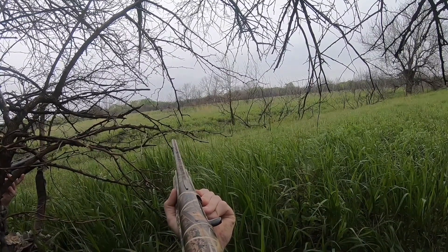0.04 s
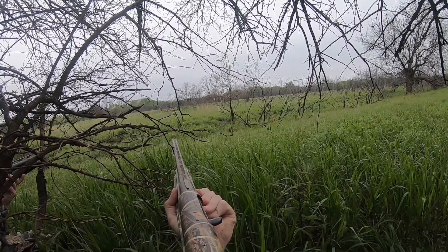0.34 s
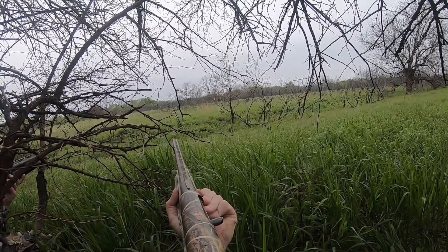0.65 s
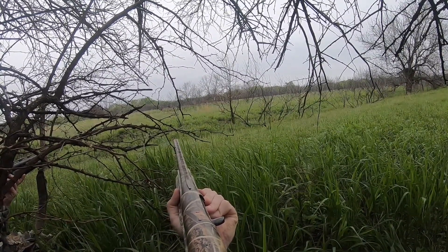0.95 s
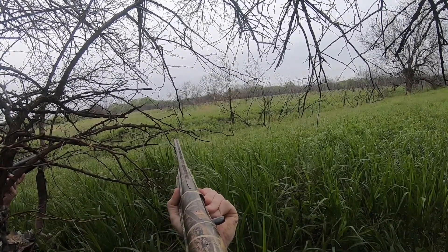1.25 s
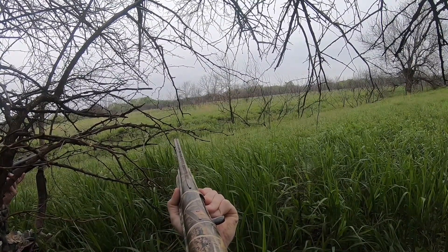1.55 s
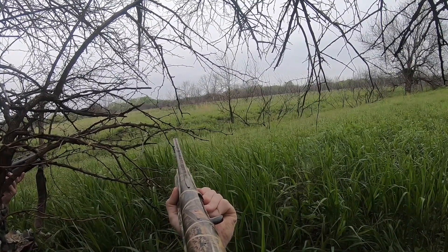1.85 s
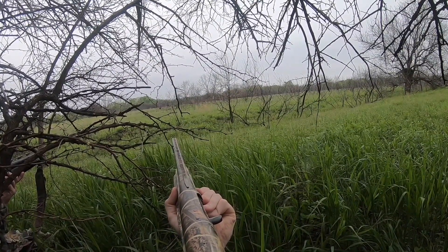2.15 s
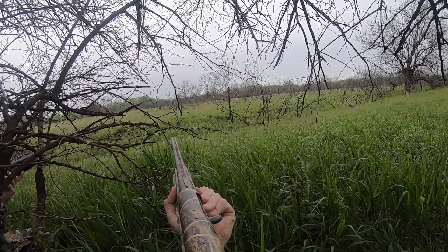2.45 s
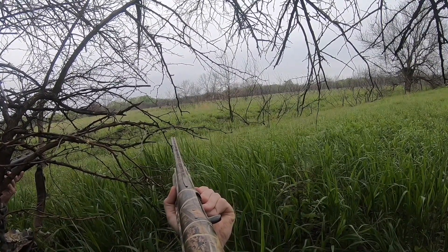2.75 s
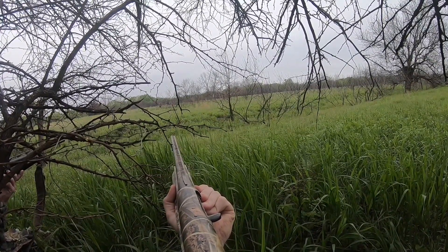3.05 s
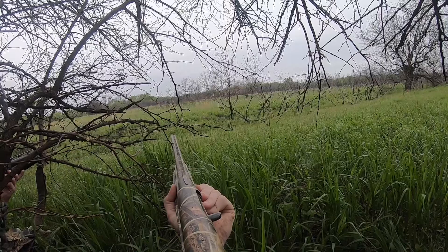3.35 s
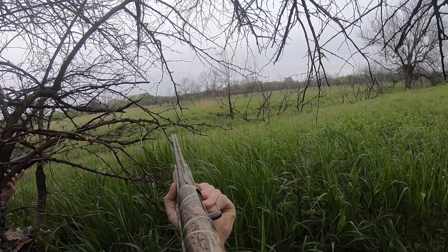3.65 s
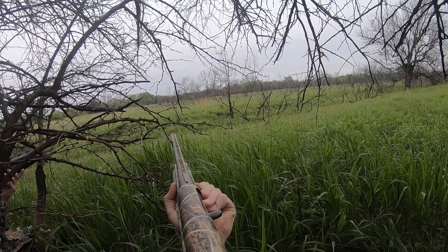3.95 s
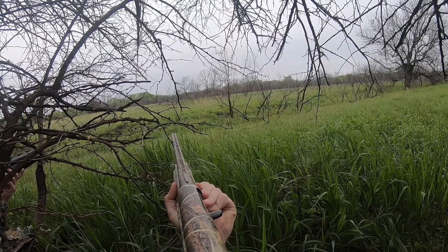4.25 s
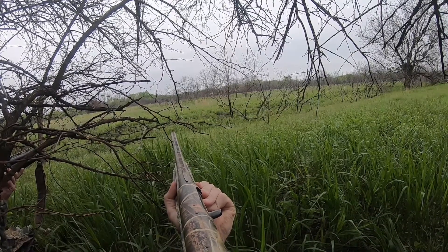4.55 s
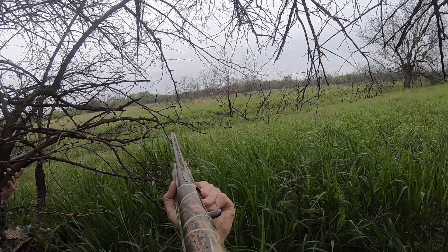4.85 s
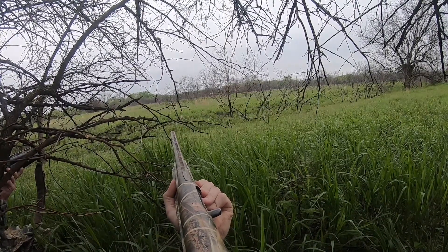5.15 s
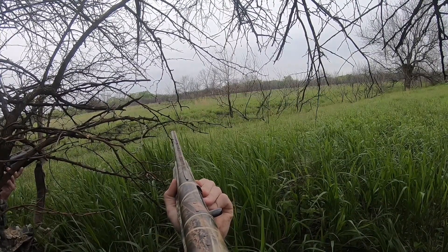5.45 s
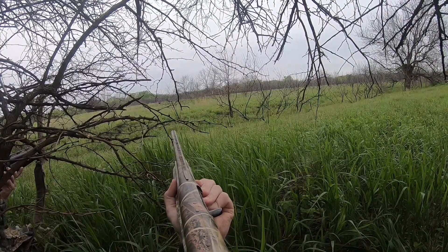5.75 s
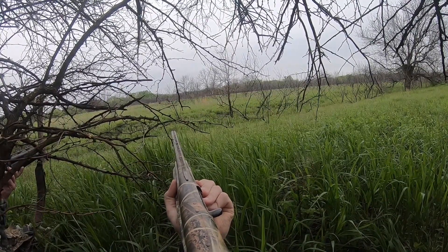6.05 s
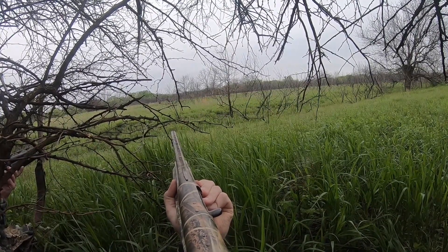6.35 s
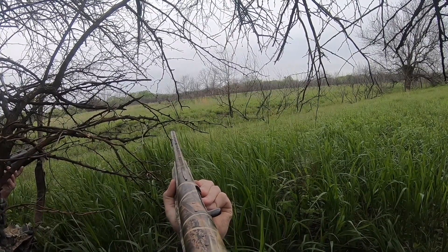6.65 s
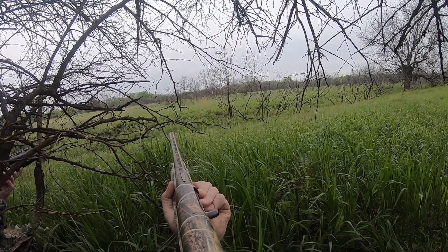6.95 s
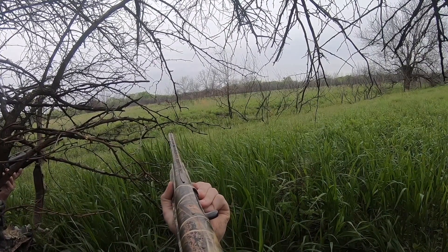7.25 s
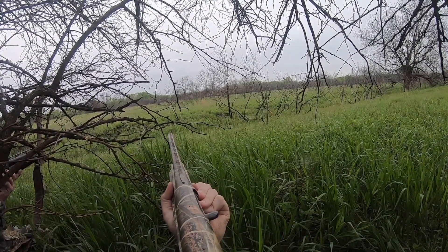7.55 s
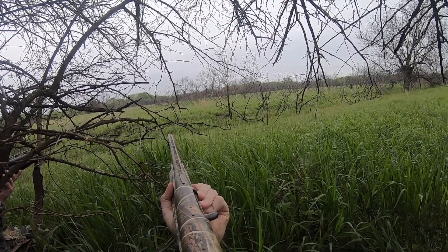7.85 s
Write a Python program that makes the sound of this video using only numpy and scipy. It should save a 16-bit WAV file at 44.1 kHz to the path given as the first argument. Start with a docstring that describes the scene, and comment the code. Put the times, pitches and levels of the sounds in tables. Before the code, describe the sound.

Birdsong in open country, picked up by a hand-held microphone with occasional dull handling thumps. A fast, high trill opens, along with a faint far knock, followed by scattered distant chirps. Halfway through, a closer, louder sparrow on the right sings sliding notes and whistles around a rapid warble, with a slight echo from the trees. Far traffic rumbles quietly beneath a light hiss throughout.

```python
"""Two sparrows sing at the edge of a meadow, to the right of a hand-held microphone. The nearer one gives
four slides, two arched whistles and a fast warbled trill; the other speeds up a trill of down-slurs.
Each note is a nearly pure tone from the syrinx, scattered by the trees. Other birds call further off,
something knocks far away, the hand bumps the microphone softly and distant traffic rumbles."""
import sys
import numpy as np
from scipy import signal
from scipy.fft import rfft, irfft
from scipy.io import wavfile
from scipy.ndimage import uniform_filter1d, map_coordinates

SR = 44100
rng = np.random.default_rng(int(sys.argv[2]) if len(sys.argv) > 2 else 0)


def dump_mix(stems):
    """Bounce the given channels to the path in sys.argv[1] as a 16-bit WAV at rate SR."""
    frames = np.atleast_2d(stems).T  # one column per channel
    limited = np.clip(frames, -1, 1)  # hard clip at full scale
    pcm = np.round(limited * 32767).astype(np.int16)
    wavfile.write(sys.argv[1], SR, pcm)


N = 357651
TIME = np.arange(N) / SR
FREQ = np.maximum(np.arange(N // 2 + 1) * SR / N, 1)

# The near sparrow's three note shapes. Each row: share of the note, pitch in Hz, level in dB.
SLIDE_SHAPE = [(0, 5450, -18), (.08, 5220, -4), (.16, 4650, -1), (.23, 4120, 0), (.31, 3880, -2),
               (.43, 3750, -4), (.82, 3670, -4), (.95, 3590, -6), (1, 3480, -20)]
ARCH_SHAPE = [(0, 2650, -19), (.11, 3200, -7), (.23, 3470, -3), (.36, 3530, 0), (.53, 3520, 0),
              (.72, 3440, -2), (.87, 3220, -4), (.96, 3040, -7), (1, 2950, -26)]
WARBLE_SHAPE = [(0, 3950, -24), (.1, 4020, -7), (.25, 4040, 0), (.33, 3790, -3), (.41, 3500, -9),
                (.49, 3330, -11), (.58, 3110, -11), (.65, 3150, -8), (.73, 3480, -2), (.81, 3800, 1),
                (.89, 3930, 0), (1, 4020, -16)]
# Its slides and arched whistles. Each row: start in seconds, length in seconds, pitch ratio, level in dB.
SLIDE_NOTES = [(3.879, .13, 1, -53.5), (4.067, .137, 1, -41.5), (4.275, .15, 1, -38.5),
               (4.489, .137, 1.01, -35)]
ARCH_NOTES = [(4.706, .197, .995, -37), (6.175, .195, .94, -39.5)]

def near_sparrow(trill_start_s=4.9385, period_s=.0989, settle_notes=1.9):
    """Nearest the microphone: slides, whistles and an even warble that starts flat, soft and long."""
    k = np.arange(12)
    unsettled = np.exp(-k / settle_notes)
    starts = trill_start_s + period_s * k
    lengths = .074 + .0044 * unsettled
    reach = 1 - .29 * unsettled
    levels = -33.5 - 1.5 * unsettled
    warbles = list(zip(starts, lengths, reach, levels))
    song = phrase(SLIDE_SHAPE, SLIDE_NOTES) + phrase(ARCH_SHAPE, ARCH_NOTES)
    song += phrase(WARBLE_SHAPE, warbles, base_hz=3200, uneven_db=.5, uneven_pitch=.005)
    return among_trees(song, left_db=-9.5, lag_ms=.23, scatter_db=-9.5, t60=.31)


# The second sparrow's quick and slow slurs. Each row: share of the note, pitch in Hz, level in dB.
SLUR_SHAPE = [(0, 4060, -27), (.16, 4260, -19), (.36, 3970, -12), (.5, 3730, -4), (.64, 3470, 1),
              (.76, 3290, -3), (.84, 3180, -8), (.92, 3200, -15), (1, 3350, -24)]
SLOW_SLUR_SHAPE = [(0, 3860, -24), (.2, 3770, -15), (.45, 3680, -2), (.63, 3500, 0), (.8, 3300, -3),
                   (.94, 3100, -4), (1, 3030, -20)]
# Its opening notes. Each row: start in seconds, length in seconds, pitch ratio, level in dB.
OPENING_NOTES = [(0.01, 0.12, 1, -44.5), (0.165, 0.08, 1.017, -42.5)]

def trilling_sparrow(start_s=.279, period_s=.0638, slur_s=.074, lag_s=.074, settle_notes=2.2):
    """Further back, down-slurs speed up to a steady beat; as the bird tires they fade and reach less high."""
    k = np.arange(25)
    unsettled = np.exp(-k / settle_notes)
    tired = (k / k[-1]) ** 1.24
    starts = start_s + period_s * k + lag_s * (1 - unsettled)
    reach = 1 - .197 * unsettled - .196 * tired ** 2
    levels = -41.5 - 6.5 * tired - 2.5 * (k == k[-1])
    slurs = [(start, slur_s, ratio, db) for start, ratio, db in zip(starts, reach, levels)]
    song = phrase(SLOW_SLUR_SHAPE, OPENING_NOTES)
    song += phrase(SLUR_SHAPE, slurs, base_hz=3200, uneven_db=.4, uneven_pitch=.005)
    return among_trees(song, left_db=-5, lag_ms=.25, scatter_db=-4, t60=.45)


def phrase(shape, notes, base_hz=0, uneven_db=0, uneven_pitch=0):
    """A bird repeats one shape, each note with its own length, strength and reach from a base pitch."""
    track = np.zeros(N)
    share, hz, db = np.transpose(shape)
    for start, length, reach, note_db in notes:
        louder, higher = rng.standard_normal(2)
        progress = np.linspace(0, 1, int(length * SR))
        contour = uniform_filter1d(np.interp(progress, share, hz), size=180, mode="nearest")
        pitch = (base_hz + reach * (contour - base_hz)) * (1 + uneven_pitch * higher)
        gain = undb(note_db + uneven_db * louder + np.interp(progress, share, db))
        add(track, start, whistle(pitch, gain * signal.windows.tukey(len(gain), .06)))
    return track


def whistle(hz, gain, waver=.008, flutter_db=2.5):
    """The syrinx gives a nearly pure tone whose pitch and strength tremble slightly."""
    hz = hz * (1 + waver * walk(237.8, len(hz)))
    flutter = undb(flutter_db * walk(166.4, len(hz)))
    return gain * flutter * np.sin(2 * np.pi * np.cumsum(hz) / SR)


def glides(notes, waver):
    """Simple whistles bend through three pitches while they swell and fade."""
    track = np.zeros(N)
    for start, length, first, middle, last, db in notes:
        progress = np.linspace(0, 1, int(length * SR))
        pitch = np.polyval(np.polyfit([0, .5, 1], [first, middle, last], 2), progress)
        gain = undb(db) * signal.windows.tukey(len(pitch), .6)
        add(track, start, whistle(pitch, gain, waver))
    return track


def among_trees(sound, left_db, lag_ms, scatter_db, t60, late_db=-15, late_t60=1.0):
    """Sound from the right reaches the left port late and weak; twigs scatter it briefly, trunks longer."""
    t = TIME[:SR]
    echoes = rng.standard_normal((2, SR)) * np.exp(.5 * rng.standard_normal((2, SR)))
    twigs, trunks = undb(-60 * t / t60), undb(late_db - 60 * t / late_t60)
    echoes *= (1 - np.exp(-t / .006)) * (twigs + trunks)
    echoes *= undb([[scatter_db + 1], [scatter_db]]) / np.linalg.norm(echoes, axis=1, keepdims=True)
    left = undb(left_db) * irfft(rfft(sound) * np.exp(-2j * np.pi * FREQ * lag_ms / 1000), N)
    return np.array([left, sound]) + signal.fftconvolve(sound[None], echoes, axes=1)[:, :N]


# Far glides. The first two rows, a fall and a rise, close the lilting bird's first song as its sixth and
# loudest syllable; the rest are a far bird's carol. Each row: start and length in seconds, first, middle and
# last pitch in Hz, level in dB.
FAR_GLIDES = [(2.035, .075, 2850, 2627, 2260, -52.5), (2.1, 0.057, 2476, 2670, 2860, -55.5),
              (2.175, 0.096, 3000, 2820, 2350, -56.5), (2.42, 0.057, 2375, 2634, 2860, -55),
              (2.485, 0.081, 3050, 3120, 3000, -63), (2.55, 0.057, 2830, 2500, 2280, -57.5),
              (2.957, 0.12, 3180, 2730, 2750, -53.5), (3.15, 0.07, 3070, 3150, 3210, -54),
              (3.235, 0.086, 2940, 2940, 2880, -52.5), (3.54, 0.1, 3150, 2630, 2520, -54),
              (3.575, .06, 3500, 3190, 2650, -56.5), (3.637, .088, 3200, 2680, 2220, -50),
              (4.04, .073, 3250, 3000, 2670, -50), (4.1, 0.067, 2875, 2530, 2370, -52),
              (4.295, 0.067, 2410, 2614, 2900, -51.5), (5.425, 0.073, 2740, 2900, 3000, -55)]

def carolling_bird():
    """Far off in the trees, a quick waver of pitch makes these glides burry."""
    return among_trees(glides(FAR_GLIDES, waver=.022), left_db=-5, lag_ms=.3, scatter_db=-2.5, t60=.38)


# A level whistle with a dip in pitch. Each row: share of the note, pitch in Hz, level in dB.
LILT_SHAPE = [(0, 2820, -22), (.1, 2770, -4), (.25, 2750, -4), (.33, 2620, -13), (.43, 2380, -4),
              (.54, 2560, -6), (.62, 2700, 0), (.78, 2710, -1), (1, 2690, -28)]
# Its songs. Each row: start in seconds, number of syllables, level in dB, stress on the dip in dB.
LILTING_SONGS = [(1.168, 5, -58, 7.5), (4.054, 6, -52.5, 0), (7.742, 3, -63, 7)]

def lilting_bird(syllable_s=.15, period_s=.171):
    """A far bird repeats one syllable on an even beat; each song leans more or less on the dip."""
    track = np.zeros(N)
    share, hz, db = np.transpose(LILT_SHAPE)
    depth = np.clip((np.median(hz) - hz) / (np.median(hz) - hz.min()), 0, 1)
    for start, count, song_db, dip_db in LILTING_SONGS:
        shape = np.transpose([share, hz, db + dip_db * depth])
        notes = [(start + k * period_s, syllable_s, 1, song_db) for k in range(count)]
        track += phrase(shape, notes, uneven_db=1.2, uneven_pitch=.006)
    return among_trees(track, left_db=-5, lag_ms=.3, scatter_db=-4, t60=.28)


# Thin notes and crisp little chirps.
# Each row: start and length in seconds, first, middle and last pitch in Hz, level in dB.
THIN_CALLS = [(1.205, 0.059, 5450, 5530, 5460, -58.5), (1.275, 0.042, 4950, 4660, 4570, -58),
              (1.485, 0.083, 4750, 4330, 3600, -56), (1.725, 0.033, 4430, 4640, 4500, -55),
              (1.74, 0.059, 4740, 4160, 3700, -53.5), (1.935, .07, 3360, 3920, 3270, -55.5)]
CRISP_CHIRPS = [(7.406, .021, 2750, 3200, 3600, -62), (7.422, .028, 3670, 3110, 2680, -58.5),
                (7.623, 0.046, 2830, 3100, 2680, -54.5), (7.673, 0.031, 2650, 3300, 3650, -55),
                (7.688, 0.056, 2900, 2890, 2600, -57)]

def thin_voices():
    """Faint neighbours whose short glides reach the microphone with little echo."""
    calls = glides(THIN_CALLS + CRISP_CHIRPS, waver=.008)
    return among_trees(calls, left_db=-5, lag_ms=.25, scatter_db=-10, t60=.25)


# High chips. Each row: start in seconds, number of chips, pitch in Hz, sweep as a share of it, level in dB.
HIGH_CHIPS = [(1.42, 1, 5600, -.2, -57), (1.636, 2, 6000, -0.25, -57), (1.714, 1, 6260, 0.32, -45),
              (1.852, 3, 6350, -0.26, -54.5), (2.085, 1, 5800, -.2, -57), (2.169, 10, 6350, 0.25, -54.5),
              (5.349, 1, 6300, 0.52, -47)]

def chipping_bird(chip_s=.0135, period_s=.0195, fall_octaves=.1, fade_db=1):
    """Bursts of quick sweeps from the trees, each chip lower and softer than the one before."""
    notes = []
    for start, count, hz, sweep, db in HIGH_CHIPS:
        for k in range(count):
            middle = hz * 2 ** (-fall_octaves * k)
            first, last = middle * (1 - sweep / 2), middle * (1 + sweep / 2)
            notes.append((start + k * period_s, chip_s, first, middle, last, db - fade_db * k))
    return among_trees(glides(notes, waver=.031), left_db=-4, lag_ms=.19, scatter_db=-2.5, t60=.23)


# Far knocks and their echoes.
# Each row: start in seconds, centre and width in Hz, rise and decay in seconds, level in dB.
FAR_KNOCKS = [(0.15, 466, 200, 0.0016, 0.0074, -40), (.149, 1430, 500, 0.0023, 0.0036, -42),
              (.16, 1540, 380, 0.047, 0.022, -52), (0.258, 820, 210, 0.043, 0.029, -53.5),
              (2.71, 1500, 260, 0.034, 0.043, -61)]

def knocks():
    """Something knocks dully in the distance: bands of noise rise and die away."""
    track = np.zeros(N)
    for start, hz, width, rise, decay, db in FAR_KNOCKS:
        band = irfft(rfft(rng.standard_normal(N)) / (1 + (2 * (FREQ - hz) / width) ** 4), N)
        age = np.maximum(TIME - start, 0)
        envelope = np.minimum(age / rise, 1) * np.exp(-np.maximum(age - rise, 0) / decay)
        track += undb(db) * envelope * band / band.std()
    return among_trees(track, left_db=-7, lag_ms=.064, scatter_db=-1, t60=.25)


# Bumps right at the microphone. Each row: middle and length in seconds, pitch in Hz, level in dB.
HAND_BUMPS = [(0.03, 0.071, 56, -30), (0.707, 0.066, 41.7, -27.5), (1.203, .11, 54, -20.5),
              (1.331, .12, 41, -25.5), (1.429, 0.11, 36.2, -28), (1.516, 0.103, 38.7, -22.5),
              (1.738, 0.067, 31.7, -24.5), (2.111, 0.069, 41.6, -30), (2.348, .091, 42.6, -33),
              (3.001, 0.052, 42.5, -21.5), (4.008, 0.13, 43.6, -33), (4.413, .056, 49.7, -30.5),
              (5.339, 0.0896, 48.4, -23), (5.444, 0.067, 48, -29.5), (6.264, 0.06, 56.5, -25.5),
              (7.137, .073, 36.2, -31), (7.6, 0.065, 45.3, -31)]

def hand_bumps(left_db=-8, left_lead_rad=1.56, wobble=.19):
    """Small movements of the hand shake the microphone for a few slow cycles, the right side most."""
    left, right = np.zeros((2, N))
    for middle, length, hz, db in HAND_BUMPS:
        start, size = middle - length / 2, int(length * SR)
        pitch = hz * (1 + wobble * walk(83, size))
        phase = 2 * np.pi * (rng.random() + np.cumsum(pitch) / SR)
        swell = undb(db) * np.hanning(size)
        octave = undb(6) * swell ** 2 * np.sin(2 * phase)  # grows with the square of the strength
        add(left, start, undb(left_db) * (swell * np.sin(phase + left_lead_rad) + octave))
        add(right, start, swell * np.sin(phase) + octave)
    return np.array([left, right])


# Low rumble and open-air hiss across the meadow. Each row: frequency in Hz, relative level in dB.
RUMBLE_SPECTRUM = [(12, -59), (20, -2.5), (43, -3.5), (62, -1), (72, -15), (86, -12.5), (113, -20.5),
                   (137, -8), (169, -5), (220, -9.5), (260, -17), (299, -18), (325, -19.5), (358, -21.5),
                   (560, -29), (730, -40), (1230, -120)]
HISS_SPECTRUM = [(330, -52), (560, -7.5), (699, 1), (838, 1), (911, -2.5), (1030, -8), (1110, -8.5),
                 (1190, -6.5), (1880, -10.5), (2040, -11.5), (2250, -12.5), (2580, -13), (2730, -15.5),
                 (6560, -17.5), (15500, -28)]
# The swell of the far traffic. Each row: time in seconds, relative level in dB.
TRAFFIC_SWELL = [(0, -48), (2.5, -51), (3.9, -51), (4.6, -48.5), (6.6, -51), (8.11, -52)]

def far_traffic(rumble_db=-47.5, hiss_db=-60.56, unrest_db=.73):
    """Distant traffic rumbles and swells slowly; a smooth hiss follows it more gently."""
    seconds, db = np.transpose(TRAFFIC_SWELL)
    swell_db = np.interp(TIME, seconds, db - db.mean())
    rumble = diffuse_noise(RUMBLE_SPECTRUM, side_db=1.3) * undb(rumble_db + swell_db + unrest_db * walk(7))
    hiss = diffuse_noise(HISS_SPECTRUM, side_db=1.6) * undb(hiss_db + .45 * swell_db)
    return rumble + hiss


# The background's width at the microphone. Each row: frequency in Hz, side minus mid in dB.
STEREO_WIDTH = [(60, -3.5), (110, 3.5), (200, 1.5), (380, 3.5), (700, 10), (1290, 7), (2380, -1),
                (4400, -5), (8120, 0), (15000, -3.5)]
# Its balance. Each row: frequency in Hz, left minus right in dB.
STEREO_LEAN = [(60, -5.5), (110, 0.5), (200, -3), (380, -2.5), (700, -0.5), (1290, 0), (2380, -0.5),
               (4400, -2.5), (8120, -1), (15000, -0.5)]

def diffuse_noise(spectrum, side_db):
    """Outdoor noise from all round, as the microphone's two ports hear it."""
    mid, side = rfft(rng.standard_normal((2, N))) * colour(spectrum)
    side *= colour(STEREO_WIDTH) * undb(side_db)
    lean = np.sqrt(colour(STEREO_LEAN))
    pair = irfft(np.array([(mid + side) * lean, (mid - side) / lean]), N)
    return pair / pair.mean(axis=0).std()


# A faint drone behind everything. Each row: pitch in Hz, level in dB.
DRONE_TONES = [(180, -61.5), (300, -69)]

def drone(waver_hz=2.21, waver_db=1.7):
    """Two low tones waver in pitch and strength, separately at each port."""
    pair = np.zeros((2, N))
    for hz, db in DRONE_TONES:
        for port in pair:
            gain = np.sqrt(2) * undb(db + waver_db * walk(4.5))
            pitch = hz + waver_hz * walk(9)
            port += gain * np.sin(2 * np.pi * np.cumsum(pitch) / SR)
    return pair


def undb(db):
    """Decibels to gain."""
    return 10 ** (np.asarray(db) / 20)


def colour(points):
    """Gain at every frequency from (Hz, dB) points."""
    hz, db = np.transpose(points)
    return undb(np.interp(np.log(FREQ), np.log(hz), db))


def walk(rate, size=N):
    """Smooth chance with a spread near 1, turning rate times a second."""
    steps = np.arange(size) / SR * rate
    return map_coordinates(rng.standard_normal(1024), [steps], order=3, mode="wrap")


def add(track, start, sound):
    """Mix a sound into a track from a start time in seconds."""
    first = int(round(start * SR))
    lo, hi = max(first, 0), min(first + len(sound), N)
    track[lo:hi] += sound[lo - first:hi - first]


def scene():
    """The meadow's edge from the microphone: sparrows in front, other birds and traffic beyond."""
    sparrows = near_sparrow() + trilling_sparrow()
    neighbours = carolling_bird() + lilting_bird() + thin_voices() + chipping_bird()
    return sparrows + neighbours + knocks() + hand_bumps() + far_traffic() + drone()


def record(dry, top_hz=15550):
    """The recorder cuts the highest treble steeply."""
    return signal.sosfilt(signal.ellip(10, .2, 70, top_hz, fs=SR, output="sos"), dry)


dry = scene()
out = record(dry)
dump_mix(out)
```